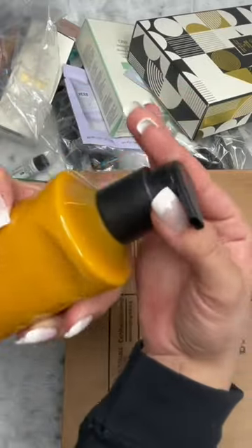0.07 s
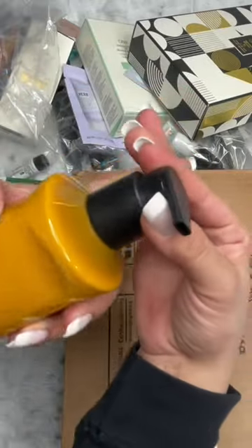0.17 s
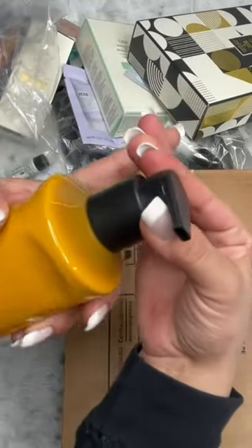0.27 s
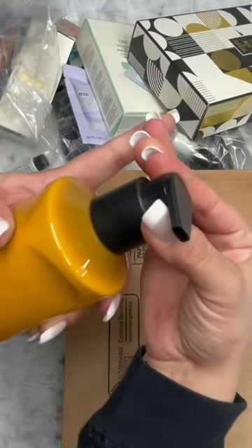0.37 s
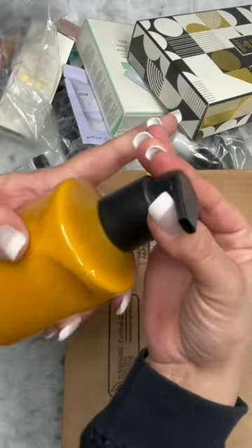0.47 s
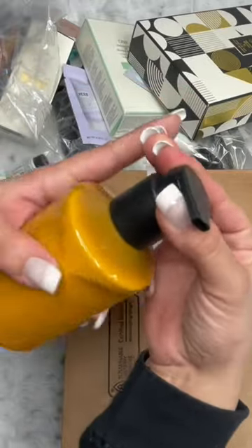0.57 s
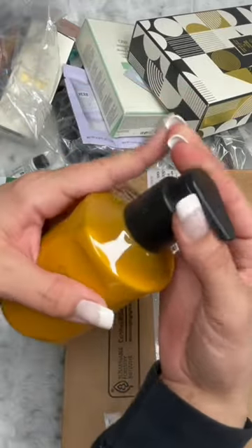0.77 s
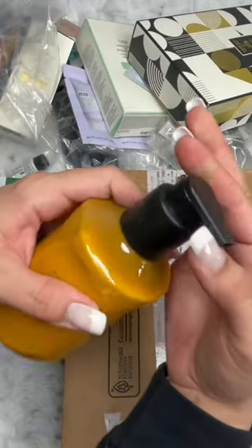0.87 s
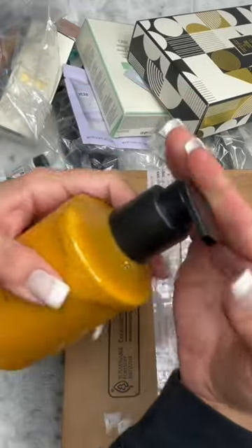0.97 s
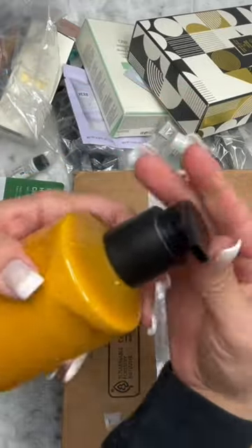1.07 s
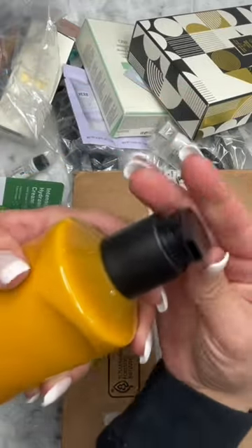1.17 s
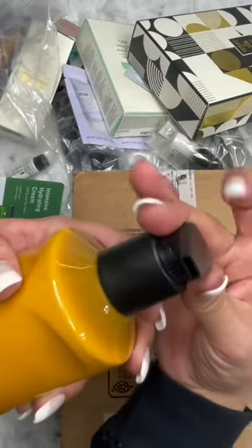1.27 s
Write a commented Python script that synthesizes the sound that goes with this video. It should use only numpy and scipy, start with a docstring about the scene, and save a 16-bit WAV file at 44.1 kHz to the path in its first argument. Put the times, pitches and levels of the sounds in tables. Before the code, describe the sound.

Long fingernails tap sharply on a plastic pump bottle, then tick and slide lightly.

```python
"""A small quiet room, with a pair of microphone ports close to a full plastic pump bottle.
Long fingernails tap it: four sharp taps ring the damped shell for a few milliseconds.
Then the fingers shift their grip, with light ticks and soft sliding rustles.
A low mains hum and room rumble lie underneath."""
import sys
import numpy as np
from scipy import signal
from scipy.fft import rfft, irfft, next_fast_len
from scipy.io import wavfile
from scipy.ndimage import uniform_filter1d

SR = 44100
rng = np.random.default_rng(int(sys.argv[2]) if len(sys.argv) > 2 else 0)


def inscribe(sig):
    """Save sig as 16-bit PCM at rate SR to the path in sys.argv[1].

    A 1-D sig is mono; a 2-D sig holds one channel per row.
    Samples are clipped to [-1, 1] before scaling.
    """
    pcm = np.round(np.clip(np.atleast_2d(sig).T, -1, 1) * 32767)
    wavfile.write(sys.argv[1], SR, pcm.astype(np.int16))


N = 57330


def amp(db):
    """Decibels to gain."""
    return 10 ** (np.asarray(db) / 20)


def unit(x):
    """Scales to rms 1."""
    return x / np.sqrt(np.mean(x ** 2) + 1e-20)


def curve(points, hz):
    """Interpolates a table on a log-frequency axis."""
    f, value = np.transpose(points)
    return np.interp(np.log(hz + 1), np.log(f + 1), value)


def add(mix, start_s, sound):
    """Mixes a sound in at a time."""
    at = round(start_s * SR)
    sound = sound[max(-at, 0):]
    part = mix[max(at, 0):][:len(sound)]
    part += sound[:len(part)]


def shape(x, response):
    """Filters by a response given as a function of frequency."""
    size = next_fast_len(2 * x.shape[-1])
    f = np.fft.rfftfreq(size, 1 / SR)
    return irfft(rfft(x, size) * response(f), size)[..., :x.shape[-1]]


def minimum_phase(gain):
    """The causal response that has a given gain curve."""
    cepstrum = irfft(np.log(np.maximum(gain, 1e-5)))
    half = len(cepstrum) // 2
    fold = np.r_[1, np.full(half - 1, 2), 1, np.zeros(half - 1)]
    return np.exp(rfft(cepstrum * fold))


def resonance(f, hz, width_hz):
    """Power response of one mode, 1 at its peak."""
    return (f * width_hz) ** 2 / ((f ** 2 - hz ** 2) ** 2 + (f * width_hz) ** 2)


def wander(size, rate_hz):
    """Slow random motion with rms 1."""
    return unit(shape(rng.standard_normal(size), lambda f: np.exp(-(f / rate_hz) ** 2)))


# How alike the room sounds at the two ports (0 to 1): frequency_hz, coherence
PORT_COHERENCE = [(50, 0.5), (300, 0.3), (800, 0), (1700, 0.37), (3000, 0.5), (4800, 0), (6500, 0),
                  (9000, 1), (13000, 0.4)]

def diffuse(size):
    """Noise reaching the two ports from all sides, partly alike in each."""
    a, b = rng.standard_normal((2, size))
    mid = shape(a, lambda f: np.sqrt((1 + curve(PORT_COHERENCE, f)) / 2))
    side = shape(b, lambda f: np.sqrt((1 - curve(PORT_COHERENCE, f)) / 2))
    return np.array([mid + side, mid - side])


# Room tone at the microphones: frequency_hz, gain_db
RUMBLE_SPECTRUM = [(15, -29.5), (30, -6), (70, 4), (100, -1), (160, -7), (210, -8.5), (320, -7.5),
                   (460, -15.5), (620, -11), (800, -21), (1100, -29.5), (2600, -33), (5700, -36),
                   (9700, -34), (11800, -35.5), (14000, -71), (16000, -83.5)]
# Swell of the bass as the bottle is handled: time_s, gain_db
HANDLING_SWELL = [(0, -0.5), (.2, -9), (.35, 3), (.45, -6), (.6, -2.5), (.8, -4.5), (.9, -2.5), (1.3, -0.5)]

def room_rumble(level_db=-64.5, bass_hz=600):
    """Low room rumble with faint hiss; only the bass swells and dips."""
    rumble = amp(level_db) * unit(shape(diffuse(N), lambda f: amp(curve(RUMBLE_SPECTRUM, f))))
    bass = shape(rumble, lambda f: 1 / (1 + (f / bass_hz) ** 4))
    swell = amp(np.interp(np.arange(N) / SR, *np.transpose(HANDLING_SWELL)))
    return rumble + bass * (swell - 1)


# Mains hum in the room: pitch_hz, level_db
HUM_PARTIALS = [(59, -70), (119, -75), (206, -80.5), (295, -81), (355, -78.5), (414, -86)]

def mains_hum(waver_depth=0.35):
    """Low tones, each wavering in level and phase."""
    t, out = np.arange(N) / SR, np.zeros(N)
    for hz, db in HUM_PARTIALS:
        a, b = wander((2, N), rate_hz=11)
        waver = 1 + waver_depth * (a + 1j * b)
        out += amp(db) * np.sqrt(2) * (waver * np.exp(2j * np.pi * hz * t)).real
    return out


# The small room's reverberation, heard from beside the bottle: frequency_hz, level_db, t60_s
ROOM_DECAY = [(149.2, -19, 0.48), (500, -3.5, 0.22), (1500, -11, 0.18), (3060, -14.5, 0.21),
              (6050, -9.5, 0.16), (8500, -21.5, 0.27), (9600, -18.5, 0.097), (10210, -20, 0.18),
              (12000, -12.5, 0.12), (15270, -22, 0.091)]

def room_reverb(source, size=16384, onset_s=0.0023):
    """The walls return a short diffuse tail, each band with its own level and decay."""
    hz, t, bands = signal.stft(diffuse(size), SR, nperseg=256)
    t60 = curve([(f, decay) for f, _, decay in ROOM_DECAY], hz)[:, None]
    level = amp(curve([(f, db) for f, db, _ in ROOM_DECAY], hz))[:, None]
    rate = np.log(1000) / t60
    decaying = bands * level * np.sqrt(2 * rate / SR) * np.exp(-rate * t)
    tail = signal.istft(decaying, SR, nperseg=256)[1][:size * 2, :size]
    tail *= np.minimum(np.arange(size) / SR / onset_s, 1)
    return signal.fftconvolve(source[None], tail, axes=1)[:, :N]


# Friction hiss on plastic, close up: frequency_hz, gain_db
FRICTION_SPECTRUM = [(300, -47), (1000, -27), (2500, 0.5), (3800, -3), (4800, 0), (5900, 3), (7600, 11),
                     (8800, 11), (9700, 7.5), (11100, 12), (13000, -18.5), (16000, -50)]
# Shifts of the grip, the first row being the fading end of an earlier tap: start_s, length_s, hiss_db,
# hollow_db, hollow_hz
GRIP_SHIFTS = [(-.02, 0.067, -59, -66, 1460), (0.486, 0.094, -63, -85, 1950), (0.774, 0.12, -64, -88, 1540),
               (0.874, 0.12, -72.5, -81.5, 1810), (0.956, 0.058, -62, -69.5, 2020),
               (1.019, 0.11, -67.5, -78, 1820), (1.099, 0.11, -67, -76.5, 1660),
               (1.257, .052, -71.5, -83, 1700)]

def finger_slides(rise_s=0.027, fall_s=0.068, grains_per_s=9000, grain_spread_db=1, swell_db=-0.5):
    """Skin and nails drag over the plastic: grainy hiss and a hollow note that shifts with the grip."""
    grains = rng.standard_normal(N) * amp(grain_spread_db * np.minimum(rng.exponential(1, N), 4))
    grains *= rng.random(N) < grains_per_s / SR
    hiss = unit(shape(grains, lambda f: amp(curve(FRICTION_SPECTRUM, f))))
    out = np.zeros(N)
    for start_s, length_s, hiss_db, hollow_db, hollow_hz in GRIP_SHIFTS:
        t = np.arange(N) / SR - start_s
        stroke = np.sqrt(np.clip(t / rise_s, 0, 1)) * np.clip((length_s - t) / fall_s, 0, 1)
        hollow = unit(shape(grains, lambda f: resonance(f, hollow_hz, width_hz=340)))
        out += stroke * (amp(hiss_db) * hiss + amp(hollow_db) * hollow)
    return out * amp(swell_db * wander(N, rate_hz=34.6))  # the rubbing swells unevenly


# Modes of the full bottle's damped shell: pitch_hz, level_db, t60_s
SHELL_MODES = [(144, 2, 0.031), (362, 1, .022), (455, -1, 0.019), (620, 1, 0.018), (886, -4, 0.017),
               (1050, -3.5, 0.017), (1301, -3, 0.047), (1510, 1, 0.016), (1900, -0.5, .011),
               (2260, -5, 0.014), (2670, -3.5, 0.0025), (3550, -3.5, 0.054), (4620, 1.5, 0.0022),
               (5734, 2, 0.0061), (8345, 3, 0.0014), (9000, -0.5, 0.0037), (10810, 4, .005),
               (12024, 4.5, 0.0097), (14700, -1, 0.0013)]
# Faint, longer ringing of the hard pump head: pitch_hz, level_db, t60_s
PUMP_MODES = [(5760, -11.5, 0.06), (11600, -16, 0.079), (11380, -12, 0.052), (11240, -6, 0.028)]
# Antiresonances between the shell's modes, and one treble lift: centre_hz, width_hz, gain_db
SHELL_DIPS = [(584, 160, -11.5), (853, 170, -1), (1592, 180, -5.5), (3140, 240, -2.5), (4100, 250, -3),
              (6560, 430, -3), (10030, 780, 5)]

def bottle_gain(f):
    """The modes of shell and pump head add in power; the faster one dies, the wider its peak."""
    power = sum(amp(db) ** 2 * resonance(f, hz, np.log(1000) / np.pi / t60)
                for hz, db, t60 in SHELL_MODES + PUMP_MODES)
    dips_db = sum(db * resonance(f, hz, width_hz) for hz, width_hz, db in SHELL_DIPS)
    return np.sqrt(power) * amp(dips_db)


def nail_force(size, skid_s, skid_db=-3, even_hz=693):
    """Spectrum of a nail landing: a click, then a skid that spreads the blow in time."""
    t = np.arange(size) / SR
    skid = rng.standard_normal(size) * np.exp(-t / skid_s) * np.sqrt(t / skid_s)
    force = rfft((t == 0) + amp(skid_db) * skid)
    band_power = uniform_filter1d(abs(force) ** 2, round(even_hz * size / SR))
    return force / minimum_phase(np.sqrt(band_power))  # flat over bands even_hz wide


# The seven bands of a tap, from thump to edge: centre_hz
TAP_BANDS = [130, 400, 1400, 3200, 5600, 10500, 15000]
# Nail and fingertip contacts, close to the microphones: start_s, skid_s,
# thump_db, thud_db, knock_db, clack_db, click_db, tick_db, edge_db,
# spot_hz, spot_db, second_hz, second_db, node_hz, node_db
CONTACTS = [(.082, 0.0027, -63, -52, -38.5, -43, -46, -55, -85, 5800, 7.5, 1500, -4, 4740, -4),
            (0.2218, 0.0014, -12, -15, -22.5, -26.5, -39, -42, -68, 3080, 7, 1900, 2, 4800, -1),
            (0.2454, 0.00052, -38, -7.5, -9, -2, -14.5, 3.5, -14, 1370, 6, 5200, 9.5, 6800, 4),
            (0.247, 0.00054, -23, -14.5, -1.5, -15, -21, -26, -26, 690, 8.5, 1450, 3.5, 2300, -7),
            (0.308, 0.0016, -52, -46, -52, -38, -33, -47, -58, 8000, 7, 1500, 3, 4800, -4),
            (0.3208, 0.00046, -39, -4, 3, -3.5, 6, 5, -7, 2014, 7, 4900, 2.5, 6930, -7.5),
            (.3401, 0.00071, -1.5, -3.5, -8.5, -6.5, -7, 4.5, -23, 2385, 11, 1555, 11, 650, -2),
            (0.493, 0.0027, -33, -39, -34.5, -41.5, -44, -52, -58, 950, 8.5, 2550, 11, 1600, -4),
            (0.5035, 0.0011, -34.5, -22, -17, -23, -30.5, -29.5, -62, 901, 13, 2586, 5, 3550, -21),
            (0.6094, 0.00042, -31, -16, -15.5, -2.5, -.5, 6.5, -0.5, 3540, 9, 2047, 9, 4550, -14.5),
            (0.668, 0.00048, -24, -28, -30, -40.5, -33.5, -34, -77.5, 1670, 15.5, 2600, -2, 4800, 4.5),
            (.69, 0.00083, -33, -34, -36, -39.5, -34.5, -55, -83, 1690, 13.5, 2300, 3.5, 4830, 0.5),
            (.7632, 0.00073, -53, -29, -45, -25, -43.5, -23.5, -68, 2450, 11, 6000, 15.5, 4670, 14),
            (.814, 0.002, -47, -28, -41, -29, -27.5, -37, -60, 2800, 8.5, 1600, 14, 4800, -17),
            (0.824, 0.0045, -23, -34, -38, -31, -35.5, -20.5, -50, 5540, 17, 7900, 2, 4900, -23),
            (.87, 0.0016, -24, -29, -28.5, -48.5, -29.5, -36.5, -69, 2390, 19, 5670, 0.5, 4830, -18),
            (0.907, .006, -8.5, -59, -30, -38, -29, -32, -60, 7440, 5, 1710, 14, 4800, -25),
            (0.9199, 0.00031, -37, -32, -8, -31.5, -30, -27.5, -63, 1070, 0.5, 6940, 13, 4860, -17),
            (0.924, 0.0011, -36, -31, -18.5, -40.5, -31.5, -34.5, -76, 1680, 22.5, 7130, 15.5, 4940, -18),
            (0.9743, 0.0013, -52, -27, -28.5, -19.5, -25, -15.5, -35, 3640, 12.5, 2010, 6, 4970, -19),
            (1.002, 0.0013, -41, -33, -39.5, -39, -71, -48, -75, 1900, 20.5, 2480, 8, 4800, -4),
            (1.068, 0.01, -9.5, -31.5, -54, -36, -38.5, -25.5, -62, 7140, 13.5, 1980, 11, 4860, 0),
            (1.265, .0013, -35, -44.5, -46.5, -38.5, -59.5, -48.5, -68, 2500, 6.5, 1614, 6, 4770, -5.5)]

def nail_taps(size=4096, spot_q=4.95, node_q=8.2, bass_lag_s=0.00792, lag_knee_hz=478.5):
    """Each contact rings the bottle; the struck spot usually favours two notes and mutes a third."""
    f, out = np.fft.rfftfreq(size, 1 / SR), np.zeros(N)
    body = bottle_gain(f)
    # Low notes arrive later than high ones.
    lag = np.exp(-2j * np.pi * bass_lag_s * lag_knee_hz * np.arctan(f / lag_knee_hz))
    for start_s, skid_s, *bands_db, spot_hz, spot_db, second_hz, second_db, node_hz, node_db in CONTACTS:
        notes = [(spot_hz, spot_db, spot_q), (second_hz, second_db, spot_q), (node_hz, node_db, node_q)]
        notes_db = sum(db * resonance(f, hz, hz / q) for hz, db, q in notes)
        colour = amp(curve(list(zip(TAP_BANDS, bands_db)), f) + notes_db)
        tap = irfft(nail_force(size, skid_s) * minimum_phase(body * colour) * lag)
        add(out, start_s - size / 2 / SR, np.roll(tap, size // 2))  # centred to keep its lead-in
    return out


# Level of the right port over the left: frequency_hz, gain_db
RIGHT_GAIN = [(60, 1.1), (300, -0.5), (1200, 1), (2200, 0), (4000, 1), (8500, 2), (12000, 0.35)]
# Phase lag of the right port behind the left: frequency_hz, lag_rad
RIGHT_LAG = [(50, 0), (200, -.2), (380, -.65), (700, -.55), (1000, -.2), (1400, .65), (3000, .6),
             (3800, .95), (4500, 2.2), (4850, 3.3), (5200, 4.7), (5900, 5.8), (6500, 6.8), (7200, 7.9),
             (8300, 8.8), (9300, 8.9), (10000, 9.6), (11000, 10.9), (12500, 12.5), (15000, 14.7)]

def scene():
    """The close bottle and the room around it, as they reach the two microphone ports."""
    bottle = nail_taps() + finger_slides()
    left, right = bottle + room_reverb(bottle) + room_rumble() + mains_hum()
    right = shape(right, lambda f: amp(curve(RIGHT_GAIN, f)) * np.exp(-1j * curve(RIGHT_LAG, f)))
    return np.array([left, right])


def record(dry):
    """The recorder cuts the treble above 16.6 kHz."""
    lowpass = signal.firwin(255, 16600, window=("kaiser", 9), fs=SR)
    return signal.oaconvolve(dry, lowpass[None], "same")


dry = scene()
out = record(dry)
inscribe(out)
```